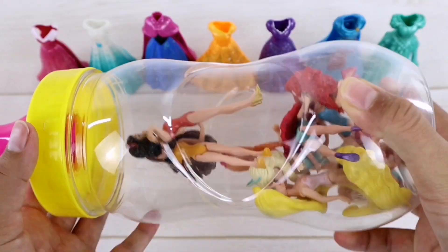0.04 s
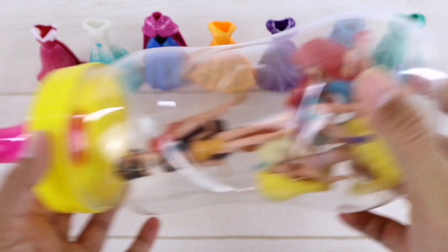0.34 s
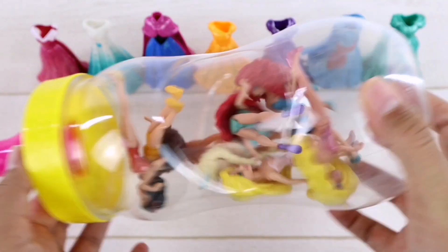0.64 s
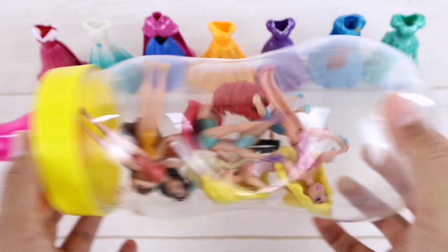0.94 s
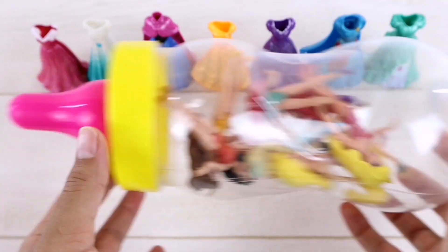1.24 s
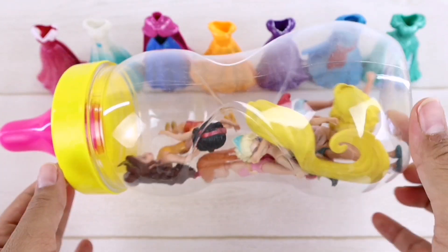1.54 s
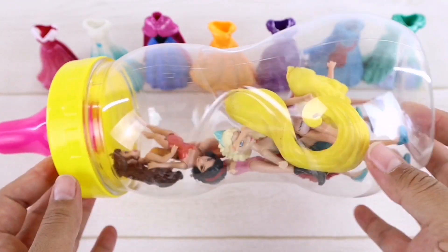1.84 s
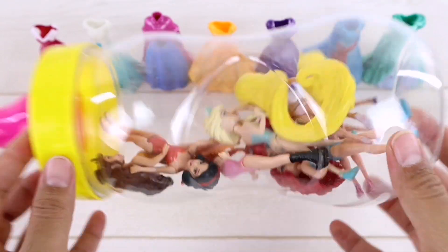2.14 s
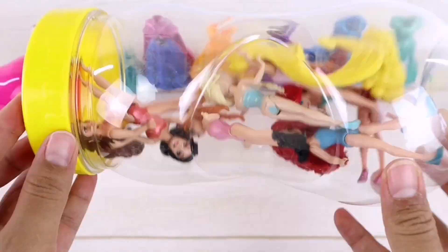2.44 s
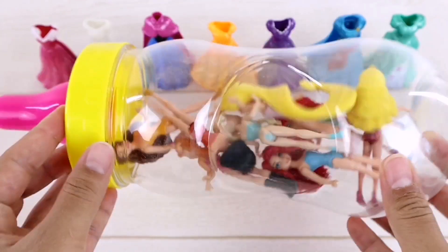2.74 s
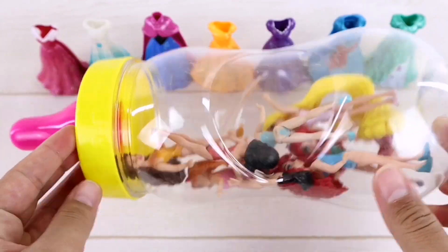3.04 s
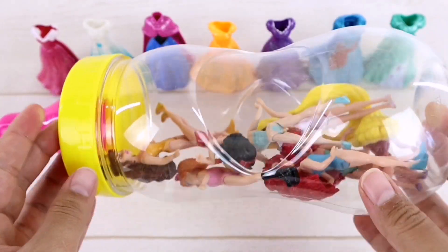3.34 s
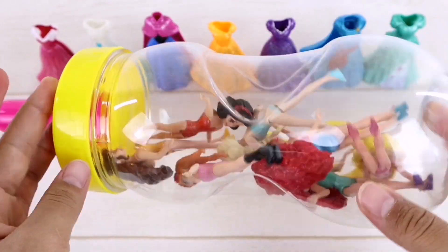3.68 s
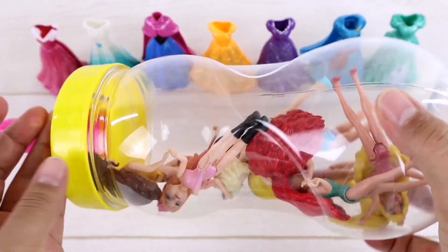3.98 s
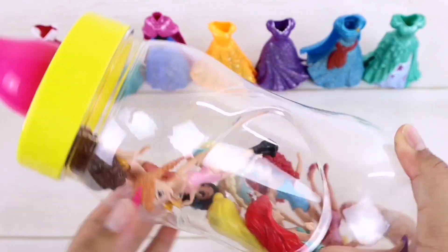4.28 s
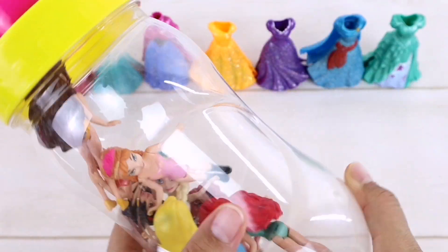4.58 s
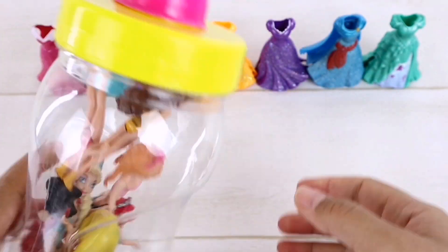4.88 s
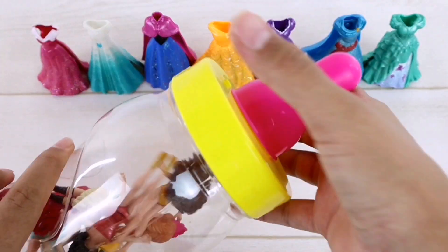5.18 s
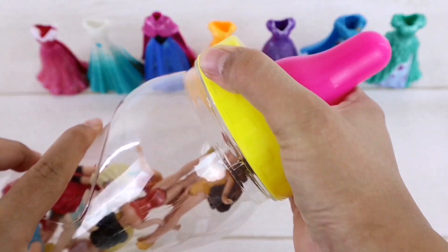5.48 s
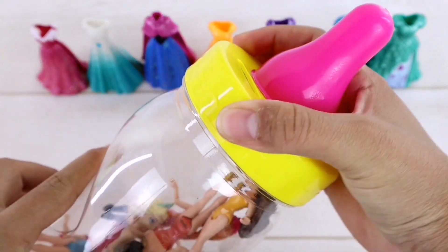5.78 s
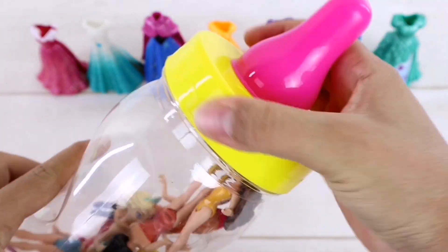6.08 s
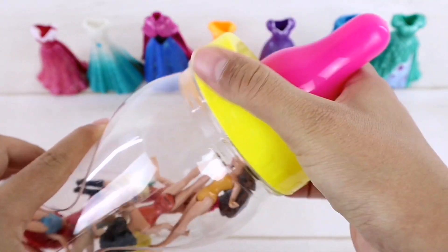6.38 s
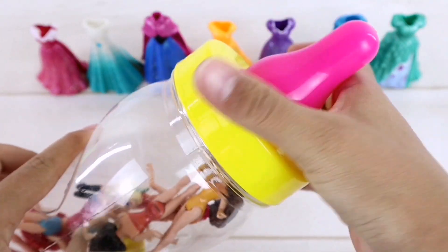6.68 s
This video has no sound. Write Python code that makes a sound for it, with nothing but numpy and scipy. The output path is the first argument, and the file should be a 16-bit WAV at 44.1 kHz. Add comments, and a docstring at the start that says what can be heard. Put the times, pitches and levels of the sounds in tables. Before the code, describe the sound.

Small hard dolls tumble inside a big, thin-walled plastic bottle, heard up close in a small room over a steady low mains hum. From the start until about 1.5 seconds the bottle is shaken, giving dense clacks, knocks and ticks with soft hollow booms. Gentle rocking leaves only a few light clicks, then hard shaking brings a loud clatter from 2.2 to 2.9 seconds. The dolls then roll and slide with sparse ticks and soft rubbing, with sharper knocks near 3.9 and 4.25 seconds. The flexing wall pops lightly around 4 seconds and twice more strongly near 4.7. A tiny finger squeak comes at about 5.15, among a few last clacks that end by 5.5. The screw cap is then twisted three times, at about 5.6, 6.1 and 6.5 seconds, with quiet grainy rasps and small clicks as the thread catches.

```python
"""In a small room, a big plastic baby bottle full of small hard dolls is shaken and turned over.
The dolls tumble against each other and the thin wall, setting its modes ringing in knocks, clacks and
ticks; the hollow bottle booms softly in the hands and its wall pops as it flexes. Then a finger squeaks
and the screw cap is twisted three times, thread rasping on thread. A low mains hum lies underneath."""
import sys
import numpy as np
from scipy import signal
from scipy.fft import rfft, irfft
from scipy.io import wavfile
from scipy.ndimage import uniform_filter1d

SR = 44100
rng = np.random.default_rng(int(sys.argv[2]) if len(sys.argv) > 2 else 0)


def store_pcm(level_fs):
    """Save levels as 16-bit WAV."""
    pcm = np.round(np.clip(level_fs, -1, 1) * 32767).astype(np.int16)
    wavfile.write(sys.argv[1], SR, np.atleast_2d(pcm).T)


N = 300762
TIME = np.arange(N) / SR
RING_SAMPLES, CRACK_SAMPLES = 4400, SR // 125  # a whole hit, and the first 8 ms that set its level
BUSY_DB, SETTLE_DB = -30, -2  # motion of a busy heap; its settling relative to the landing

# The bands of the wall's knock, the dolls' clack and snap, and the contact tick.
# Each row: low edge in Hz, high edge in Hz.
BANDS = [(230, 1100), (1100, 2600), (2600, 5500), (5500, 15500)]
# The dolls land: shaken end to end until 1.5 s, rocked gently, shaken hard from 2.2 to 2.9 s, then
# rolled over and tipped upright. Weight feeds the knock, sharpness the tick; spot and limb set the pitch.
# Each row: start in seconds, level in dB, weight in dB, sharpness in dB, boom in dB, belly ring in dB,
# scatter in seconds, then the pitches of knock, clack and snap in Hz.
LANDINGS = [(0.016, -27.0, 12, 7.5, -13.5, -24.0, 0.011, 290.0, 2260.0, 2750.0),
            (0.033, -15.5, -15, 3, -33, -7.5, 0.0032, 686, 1390, 2750),
            (0.074, -25, 3, 2, -27, -28, 0.0063, 350.0, 1630.0, 2750.0),
            (0.104, -26, 2, -1, -22.5, -22.0, 0.0079, 367, 2500.0, 3400.0),
            (0.116, -29.5, -3, 1, -42, -35.0, 0.003, 350.0, 2500.0, 3430.0),
            (0.161, -41.5, 16.5, 5.0, -29, -42.0, 0.0055, 620.0, 1170.0, 3360.0),
            (0.203, -39.5, 10, 0.0, -47, -29, 0.002, 340.0, 1230.0, 2810.0),
            (0.286, -26.5, -13, 2.5, -43, -30, 0.0036, 1050.0, 1300, 2720),
            (0.3338, -22, 2.5, -5, -25, -4.5, 0.0008, 840, 2340, 3270),
            (0.366, -37, 4, 4, -50, -12.5, 0.0022, 750.0, 2230.0, 3550.0),
            (0.382, -24, 7, -7, -23, -11, 0.005, 497, 1170.0, 4560),
            (0.397, -32, 9, 0, -39, -13, 0.00064, 620.0, 1170.0, 4960.0),
            (0.435, -32, 4.0, -1, -39, -23, 0.0042, 650.0, 2470.0, 4060.0),
            (0.478, -32.5, -5.0, 9.5, -45.0, -27, 0.0041, 640.0, 1790.0, 3880.0),
            (0.504, -27.5, 13, 3, -17, -31.0, 0.0096, 490.0, 2140.0, 4960.0),
            (0.5142, -19.5, 9.5, -2, -41, -14.0, 0.0006, 516, 2140.0, 3800.0),
            (0.5184, -18.5, -9, 10, -42, -30.0, 0.0006, 520.0, 2200.0, 5010.0),
            (0.5276, -23.0, -11, 1.0, -45.0, -35.0, 0.001, 310.0, 2140.0, 5180.0),
            (0.539, -15, -30.0, 10, -25.0, -25.0, 0.002, 830.0, 2200.0, 4900.0),
            (0.587, -34, 0, 4, -40.0, -28, 0.004, 480.0, 1680.0, 3880.0),
            (0.637, -27.5, 3.5, 7, -28, -14, 0.0052, 570.0, 1370.0, 5300.0),
            (0.651, -26, 4.5, 4, -42, -30.0, 0.0047, 610.0, 2030.0, 2780.0),
            (0.6616, -16.0, 3, -5, -28.0, -31, 0.00089, 640.0, 2000, 2780.0),
            (0.68, -27, 0.0, -11, -32.0, -18, 0.0051, 870.0, 1700.0, 4440.0),
            (0.706, -33.0, 7, -17, -21, -9.5, 0.0049, 640.0, 1370.0, 3070.0),
            (0.765, -22, 6, 1, -24, -18, 0.0024, 1040, 1280.0, 3180.0),
            (0.7728, -17.0, -14, 3.5, -32, -36.0, 0.0021, 740.0, 2230.0, 3200),
            (0.792, -27.5, 1, 2, -33, -30.0, 0.0033, 580.0, 2410.0, 5180.0),
            (0.803, -19, -0.5, 9, -20, -21, 0.0034, 260.0, 2370.0, 5170),
            (0.832, -21.5, -32, 6.5, -40.0, -40.0, 0.0013, 260.0, 2500.0, 2750.0),
            (0.868, -29, -9, -7, -33, -30.0, 0.0056, 1050.0, 1170.0, 2750.0),
            (0.906, -32, 16, 6.5, -23.5, -10.5, 0.0044, 640.0, 1170.0, 5300.0),
            (0.919, -27, 7.5, 7, -31, -30.0, 0.00057, 260.0, 2090.0, 2750.0),
            (0.936, -16, -0.5, -4.0, -34.0, -30.0, 0.0025, 395, 1980.0, 2780.0),
            (0.944, -21, 3.5, 4.0, -21.5, -7.5, 0.0043, 370.0, 1420.0, 5300.0),
            (1.011, -29.0, 10.5, -8, -22.0, -24, 0.0051, 443, 1510.0, 3210.0),
            (1.026, -27, 2, 2, -26, -19, 0.0027, 310.0, 1380.0, 3290.0),
            (1.0559, -23, -13.0, 8.5, -19, -31, 0.003, 960.0, 2310.0, 5300.0),
            (1.069, -15.5, -20.0, 5.5, -29, -13, 0.0011, 260.0, 2280, 5300.0),
            (1.09, -23.5, -25.0, 12, -47.0, -37.0, 0.00049, 1050.0, 1810.0, 3320.0),
            (1.134, -26, -4, 5, -45, -16, 0.01, 720.0, 1720.0, 3880.0),
            (1.159, -29.5, 16.5, 3, -16.5, -12, 0.001, 606, 1170.0, 5180.0),
            (1.174, -25.0, 3, 4, -35.0, -30.0, 0.003, 500.0, 1720.0, 2750.0),
            (1.186, -22.5, 11, 0.0, -17, -24, 0.0032, 500.0, 1700.0, 3290.0),
            (1.201, -23, 5, 2, -19, -24, 0.017, 495, 1490.0, 4640.0),
            (1.2992, -23.0, 5, -6, -20, -4, 0.0009, 740, 2440.0, 2750.0),
            (1.3155, -21, -20.0, 11, -50.0, -40.0, 0.00035, 850.0, 2410.0, 3040.0),
            (1.3167, -14, -17, 4, -49.0, -30.0, 0.0012, 850.0, 2410.0, 3040.0),
            (1.331, -32, -5.0, -2, -43, -35.0, 0.002, 380.0, 1660.0, 3210.0),
            (1.376, -32, 9, 3.0, -42, -35.0, 0.0061, 1050.0, 1170.0, 3750.0),
            (1.403, -27, 11, 5, -23.0, -19, 0.0094, 586, 1170.0, 5070.0),
            (1.43, -22, 3, 3, -21, -25.0, 0.014, 870.0, 1260.0, 3460),
            (1.443, -23.5, -2, 7.5, -36, -27, 0.0028, 520.0, 1630.0, 4850.0),
            (1.4549, -20.5, 9.5, 0, -43, -34, 0.0019, 530, 1570.0, 2910.0),
            (1.636, -40, 7.5, 8, -53.0, -29, 0.0033, 260.0, 1220.0, 5100),
            (1.719, -32, -0.5, 5, -31, -19, 0.0033, 410.0, 1400.0, 3590.0),
            (1.735, -30.5, 9, 3.5, -24.5, -19.5, 0.0097, 390.0, 1690, 5180.0),
            (1.874, -53, -7, 4.0, -57, -55.0, 0.0011, 260.0, 1420.0, 4850.0),
            (1.912, -40.5, 0, -2, -37.0, -34, 0.0039, 260.0, 1770.0, 3180.0),
            (1.974, -35.5, -8, 1, -32, -40, 0.0037, 260.0, 2500.0, 2750.0),
            (1.997, -39, -2, -1, -47, -54.0, 0.002, 426, 1300, 2780.0),
            (2.115, -36, -25.0, 5.5, -60.0, -43.0, 0.0014, 1050.0, 2500.0, 4240.0),
            (2.134, -30, 4.5, -11, -27, -26, 0.008, 325, 1810, 2750.0),
            (2.168, -30.5, 3, 1, -23, -29, 0.0044, 640.0, 1530.0, 2750.0),
            (2.246, -22, -14, 6, -26.5, -18, 0.0026, 980.0, 1370.0, 4670),
            (2.301, -24.5, -10, -13, -12.5, -13, 0.0036, 740.0, 1260.0, 3800.0),
            (2.307, -16.0, 4.0, -5, -17.5, -7.5, 0.0037, 746, 1270, 3880.0),
            (2.318, -21.0, 1.5, 10, -32, -30.0, 0.005, 1030.0, 1400.0, 3930.0),
            (2.327, -16, -9, -1, -29, -12, 0.005, 390.0, 1410, 3970.0),
            (2.422, -21.5, 11.5, 10.5, -23, -13, 0.0022, 530.0, 1400.0, 2860),
            (2.433, -22.5, -1, 4, -35.0, -30.0, 0.006, 290.0, 1770.0, 2810.0),
            (2.447, -21.5, 4, 6, -19, -25.0, 0.0078, 530.0, 1740.0, 5300.0),
            (2.485, -29.5, -6, 17, -24, -39, 0.0084, 260.0, 1230.0, 2970.0),
            (2.497, -14, 4, 3.5, -17, -4, 0.004, 690, 1250.0, 2970.0),
            (2.587, -14, -4, 0.5, -17, -18.0, 0.0026, 700.0, 1740.0, 2730),
            (2.604, -24.0, 6, 15, -23, -3.5, 0.0031, 670.0, 1370.0, 4340.0),
            (2.61, -21.5, 5.5, -4, -23, -9.0, 0.0011, 300.0, 1380.0, 4360),
            (2.663, -17.5, 3, 5.5, -19, -23, 0.0047, 260.0, 1230.0, 2940.0),
            (2.671, -17.5, 5, 3, -31, -9.0, 0.004, 260.0, 1220.0, 2750.0),
            (2.682, -15.5, 1, 4, -24, -23.0, 0.0075, 890.0, 2140, 2750.0),
            (2.759, -24.5, 6, 1, -23, -9.5, 0.0015, 640.0, 1910.0, 3550.0),
            (2.7643, -15.5, -0.5, 8.0, -41.0, -34.0, 0.00087, 670.0, 1880, 3570),
            (2.78, -29.5, 6, 9, -43, -30.0, 0.0087, 640.0, 1770.0, 4850.0),
            (2.796, -19.5, 7, -4, -18.0, -3, 0.0054, 695, 1370.0, 4590.0),
            (2.83, -24.5, 11, 5.0, -37, -30.0, 0.0044, 300.0, 1170.0, 4010.0),
            (2.838, -19.5, 1, 3.5, -35.0, -30.0, 0.0027, 300.0, 1170.0, 3970.0),
            (2.844, -16, 1, 2.5, -19, -8.5, 0.003, 810.0, 1170.0, 4640.0),
            (2.854, -20.5, -2, 0, -30, -19, 0.0026, 610.0, 2090.0, 3290.0),
            (2.867, -31, -8, 10, -40.0, -28, 0.004, 260.0, 2090.0, 3110.0),
            (2.973, -36.5, 12, 5, -30, -19, 0.0099, 764, 2170.0, 5300.0),
            (3.022, -28, 0, -1, -41, -16.5, 0.0017, 694, 1170.0, 3040.0),
            (3.162, -46, 6, 9, -45, -55.0, 0.0015, 790.0, 1680.0, 2940.0),
            (3.207, -40, 12, 0, -33, -42.0, 0.022, 420, 1740.0, 3970.0),
            (3.249, -39, -8.0, 7, -33, -60, 0.0017, 330.0, 2280.0, 3360.0),
            (3.28, -44.5, 5.5, 9, -53.0, -46.0, 0.0012, 260.0, 1190.0, 3140.0),
            (3.418, -44, 11.5, 7.5, -25.5, -44, 0.0068, 262, 1170.0, 3800.0),
            (3.596, -46.5, -4, 10, -37, -42, 0.0043, 930.0, 1170.0, 3970.0),
            (3.738, -35, -3, 5.5, -35.0, -42.0, 0.011, 960.0, 2500.0, 3970.0),
            (3.763, -32.5, -13, 4, -34.0, -44.0, 0.0092, 360.0, 2220, 4360),
            (3.804, -37, -6.0, -7.0, -27, -42.0, 0.002, 260.0, 2010.0, 4390.0),
            (3.819, -30.5, 1.5, -1.0, -27, -36.0, 0.007, 450.0, 1720.0, 4390.0),
            (3.839, -29, 1, 2, -25, -34, 0.0025, 890, 1280.0, 4900.0),
            (3.86, -43, 4, 8, -38, -44.0, 0.0026, 260.0, 2090.0, 4740.0),
            (3.8883, -15.5, -3.5, -0.5, -16.5, -23, 0.0012, 264, 2200.0, 2750.0),
            (4.021, -43.5, 6, 3, -41, -49, 0.0036, 307, 1930.0, 4540.0),
            (4.185, -39, -7, 11, -50.0, -50.0, 0.0015, 260.0, 2500.0, 5300.0),
            (4.199, -33, 0, 8.5, -36.0, -42.0, 0.0064, 550.0, 1170.0, 5300.0),
            (4.21, -29.5, 10, 8, -23, -26, 0.003, 547, 1170.0, 4500),
            (4.244, -23.5, 2, -2, -13, -18, 0.0052, 260.0, 2110.0, 3630.0),
            (4.271, -25.5, 2.5, -14, -16.5, -6.5, 0.0016, 473, 1400.0, 2750.0),
            (4.363, -39, 13.5, 10.5, -44.0, -25, 0.0066, 1050.0, 1170.0, 3670),
            (4.514, -34.5, 1, 1, -27, -31, 0.0065, 810.0, 2210, 5300.0),
            (4.538, -30.5, 5.5, -4, -31, -24.0, 0.0003, 760, 1710, 3010.0),
            (4.603, -28, -20, 7, -53, -33, 0.0005, 1040, 2440, 3920),
            (4.768, -25, -4.5, 3, -36, -30, 0.00035, 1050.0, 1880.0, 4290.0),
            (4.776, -28, -22, 3, -47, -38.0, 0.001, 1050.0, 1540, 4200.0),
            (4.799, -26.5, 5.5, -3.0, -16.5, -42.0, 0.0037, 744, 2060.0, 3160),
            (4.858, -56, 25, -10.0, -27, -45.0, 0.0005, 372, 1170.0, 3110.0),
            (4.914, -49.5, 15, 8, -56.0, -49.0, 0.0008, 470.0, 1330.0, 3110.0),
            (4.988, -42.5, 2, 11.5, -41, -47, 0.0014, 260.0, 2470.0, 5300.0),
            (4.996, -41.0, 7, 12, -31, -47.0, 0.0034, 260.0, 1700.0, 5300.0),
            (5.095, -17, -0.5, -5, -19.5, -26, 0.0019, 313, 1440, 3280),
            (5.167, -22.5, -3, 5, -19, -22, 0.0027, 370.0, 1460.0, 4340.0),
            (5.177, -29, 4, 3.0, -36, -35.0, 0.0038, 390.0, 1400.0, 4540.0),
            (5.21, -22, 3.5, 3.5, -20.5, -7, 0.0016, 860, 1930.0, 3150),
            (5.358, -32, 1, -1.0, -32, -17, 0.0041, 1000.0, 1930.0, 4290.0),
            (5.375, -19.5, -18.0, 3, -51, -42, 0.00073, 1000.0, 1980.0, 3360.0),
            (5.383, -20.5, -21, 4, -54, -23, 0.0012, 1050.0, 2500.0, 3320.0),
            (5.446, -37.5, 8, 1, -31.5, -37, 0.0071, 1040, 1160, 2750.0)]
# The cap catches and lets go on its thread. Each row: start in seconds, click level in dB,
# sharpness in dB, cap knock in dB, pitch factor of that knock, scatter in seconds.
CATCHES = [(5.872, -30.5, 9.5, -29, 1.1, 0.00032), (5.887, -34.5, 5, -22, 1, 0.0041),
           (5.908, -40, 8, -43, 0.71, .0004), (5.932, -38, -10, -23.5, 0.79, 0.00081),
           (5.939, -42.5, 2, -36, 1.1, 0.00089), (5.951, -45.5, -7, -40, 0.9, 0.00071),
           (6.047, -47.5, 7, -49, 1.6, 0.017), (6.099, -38, 11, -25.5, 2.02, 0.00033),
           (6.455, -46, -1, -29, 0.71, 0.0023), (6.464, -41, 4, -40, 1.1, .002),
           (6.599, -32, 3, -26.5, 1.17, 0.016), (6.707, -49, 11, -56, 0.89, 0.0017)]


def from_db(db):
    """Decibels to gain."""
    return 10 ** (np.asarray(db) / 20)


def unit_rms(x):
    """Scale to an rms of one."""
    return x / np.sqrt(np.mean(x ** 2) + 1e-20)


def flutter(size, smoothing):
    """Smoothed random wobble at unit rms."""
    return unit_rms(uniform_filter1d(rng.standard_normal(size), size=smoothing))


def at_hz(curve, hz):
    """Read an EQ curve on a log-frequency axis."""
    curve_hz, db = np.transpose(curve)
    return np.interp(np.log(hz + 0.0012), np.log(curve_hz), db)


def nearness(hz, centre_hz, octaves):
    """A bell over pitch, one at its centre."""
    return np.exp(-.5 * (np.log2(hz / centre_hz) / octaves) ** 2)


def add(out, sound, start_s):
    """Mix a sound in at its start time."""
    i = max(int(start_s * SR), 0)
    part = sound[..., :max(N - i, 0)]
    out[..., i:i + part.shape[-1]] += part


def cut(x, hz, kind, order=2):
    """Low- or high-pass filter."""
    return signal.sosfilt(signal.butter(order, min(hz, .45 * SR), kind, fs=SR, output="sos"), x)


def diffuse(curve, size, apart_hz):
    """Coloured stereo noise: centred in the bass, wide above apart_hz."""
    hz = np.arange(size // 2 + 1) * SR / size
    mid, side = rfft(rng.standard_normal((2, size)))
    alike = 1 / (1 + (hz / apart_hz) ** 2)
    pair = np.sqrt(1 + alike) * mid + np.sqrt(1 - alike) * side * [[1], [-1]]
    return unit_rms(irfft(pair * from_db(at_hz(curve, hz)), size))


def room_tone(hum_hz=100, hum_db=-51.5, air_db=-45):
    """Mains hum and the still air of the room."""
    # The colour of the air. Each row: frequency in Hz, relative level in dB.
    air_colour = [(25, -1), (60, 2.5), (110, 7), (160, 18), (250, 2), (600, 1.5), (1500, -9.5),
                  (4000, -16.5), (9000, -25.5), (12000, -30), (13500, -40), (16000, -65)]
    hum = from_db(hum_db) * np.sqrt(2) * np.sin(2 * np.pi * hum_hz * TIME)
    return hum + from_db(air_db) * diffuse(air_colour, N, apart_hz=706)


def room_reverb(x, wet_db=-10, low_t60=0.32, high_t60=0.064, build_s=0.0051):
    """The small room answers with a dense tail that dies sooner in the treble."""
    # The colour of the tail. Each row: frequency in Hz, relative level in dB.
    colour = [(100, -10), (300, -9.5), (700, -7.5), (2000, 2), (6000, 4.5), (15000, 4.5)]
    t = np.arange(SR // 2) / SR
    noise = diffuse(colour, len(t), apart_hz=1570)
    low = cut(noise, 780, "low", order=1)
    tail = low * from_db(-60 * t / low_t60) + (noise - low) * from_db(-60 * t / high_t60)
    tail *= 1 - np.exp(-(t / build_s) ** 2)
    tail /= np.sqrt(np.sum(tail ** 2) / 2)
    return from_db(wet_db) * signal.fftconvolve(x, tail, axes=1)[:, :N]


def wall_lift(hz):
    """Gain in dB that the thin wall's resonances give each frequency."""
    # The wall's resonances. Each row: centre in Hz, width in Hz, lift in dB.
    resonances = [(296.5, 66, 5.5), (385, 27, 6.5), (578, 6.5, 3), (634, 46, 6.5), (763, 23, 5),
                  (798, 145, 7.5), (844, 30, 8), (1036, 117, 10.5), (1321, 71, 7), (1742, 86, 6.5),
                  (1780, 24, -2.5), (1910, 290, 0), (2164, 520, 7.5), (3130, 40, 4.5), (3920, 79, 1.5),
                  (4940, 190, -1.5)]
    return sum(lift / (1 + (2 * (hz - centre) / width) ** 2) for centre, width, lift in resonances)


def heap_motion(at_s, settle_db, slip_db=None, rise_s=0.0052, settle_db_per_s=311, slip_db_per_s=900):
    """The heap stirs, slides and settles after each landing; given slip_db, it also slips into each."""
    # The steady stirring of the heap. Each row: time in seconds, level in dB.
    stir = [(0.0, -22), (0.19, -48), (0.36, -58), (0.51, -27.5), (0.87, -28.5), (1.33, -28), (1.52, -39.5),
            (1.92, -54), (2.09, -47.5), (2.49, -32), (2.7, -30), (2.89, -26.5), (3.02, -35), (3.3, -45),
            (3.55, -41.5), (3.95, -38), (4.33, -42.5), (4.75, -36.5), (4.92, -43.5), (5.32, -35.5),
            (5.39, -43), (6.82, -56)]
    # Slides along the wall as the bottle turns.
    # Each row: middle in seconds, half length in seconds, level in dB.
    slides = [(0.74, 0.026, -23.5), (3.578, 0.017, -34), (3.83, 0.029, -34), (4.216, 0.029, -35),
              (4.289, 0.029, -20.5), (5.195, 0.0069, -22.5)]
    since = at_s[:, None] - np.array(LANDINGS)[:, 0]
    settling = np.clip(since / rise_s, 0, 1) * from_db(settle_db - settle_db_per_s * np.abs(since))
    slipping = 0 if slip_db is None else (since < 0) * from_db(slip_db - slip_db_per_s * np.abs(since))
    sliding = sum(from_db(db) * np.exp(-.5 * ((at_s - s) / half) ** 2) for s, half, db in slides)
    stirring = from_db(np.interp(at_s, *np.transpose(stir)))
    return np.sqrt(stirring ** 2 + sliding ** 2 + np.sum((settling + slipping) ** 2, axis=1))


def rubbing(busy_level_db=-41, waver_db=0.5):
    """Dolls and fingers slide on the smooth wall: a soft rub that swells with the heap's motion."""
    # The colour of plastic on plastic. Each row: frequency in Hz, relative level in dB.
    rub_colour = [(100, -14), (300, 5.5), (700, 3.5), (1200, 1.5), (2500, -6), (5000, -3), (8000, -22.5),
                  (11500, -31), (13500, -30), (16000, -65)]
    slots = np.arange(0, TIME[-1], 1 / 200)
    motion = heap_motion(slots, np.array(LANDINGS)[:, 1] + SETTLE_DB) / from_db(BUSY_DB)
    pressure = from_db(waver_db * flutter(len(slots), smoothing=5))
    hz = np.geomspace(100, SR / 2, 600)
    colour = np.transpose([hz, at_hz(rub_colour, hz) + wall_lift(hz)])
    swell = from_db(busy_level_db) * np.interp(TIME, slots, pressure * motion)
    return swell * diffuse(colour, N, apart_hz=1380)


def finger_squeak(start_s=5.15, length_s=0.019, level_db=-21.5):
    """Skin sticks and slips on the plastic: a short rough tone that drops as the grip slows."""
    start_hz, end_hz, glide_s, roughness = 1000, 900, 0.0035, 0.24
    t = np.arange(SR // 20) / SR
    hz = end_hz + (start_hz - end_hz) * np.exp(-t / glide_s)
    hz *= 1 + roughness * flutter(len(t), smoothing=40)
    swell = np.sin(np.pi * np.minimum(t / length_s, 1))
    out = np.zeros(N)
    add(out, from_db(level_db) * swell * np.sin(2 * np.pi * np.cumsum(hz) / SR), start_s)
    return out


def wall_pops(crack_t60=0.03, ring_t60=0.034, ring_db=-12, click_hz=2000, click_db=8.5):
    """The thin wall flexes in the grip and snaps through: one sharp pulse and a short dry burst."""
    # The pops. Each row: start in seconds, level in dB.
    pops = [(3.924, -31), (3.98, -27), (4.042, -30.5), (4.124, -36), (4.6731, -17), (4.7222, -21.5)]
    # The colour of the burst. Each row: frequency in Hz, relative level in dB.
    colour = [(200, -31), (500, -25), (800, 2), (1300, -13), (1750, 4), (2200, 2), (2900, -6.5),
              (4300, -3.5), (6000, -21), (12000, -45), (16000, -58)]
    t = np.arange(RING_SAMPLES) / SR
    fade = from_db(-60 * t / crack_t60) + from_db(ring_db - 60 * t / ring_t60)
    click = np.sin(2 * np.pi * click_hz * t) * np.exp(-click_hz * t / 2)
    out = np.zeros((2, N))
    for start_s, db in pops:
        burst = diffuse(colour, len(t), apart_hz=2960) * fade
        burst /= np.sqrt(np.mean(burst[:, :CRACK_SAMPLES] ** 2))
        add(out, from_db(db) * (burst + from_db(click_db) * click), start_s)
    return cut(out, 10000, "low", order=4)


def thuds(blows, modes, gain_db, rise_s, detune, spread_db=3):
    """Each blow (start in seconds, level in dB, pitch factor) rings the modes, never quite alike."""
    t = np.arange(SR // 3) / SR
    hz, db, t60 = np.transpose(modes)[:, :, None]
    out = np.zeros(N)
    for start_s, blow_db, pitch in blows:
        strength, phase, tuning = rng.standard_normal((3, len(modes), 1))
        waves = np.sin(2 * np.pi * hz * pitch * (1 + detune * tuning) * t + 1.41 * phase)
        fades = from_db(db + spread_db * strength - 60 * t / t60)
        ring = np.sum(fades * waves, 0) * (1 - np.exp(-t / rise_s))
        add(out, ring / np.abs(ring).max() * from_db(blow_db + gain_db), start_s)
    return out


def bottle_boom():
    """Landing dolls and bumping hands jolt the hollow bottle into a soft, deep boom."""
    # The bottle's deep modes. Each row: frequency in Hz, level in dB, time to fall 60 dB in seconds.
    modes = [(117, -29, .12), (146, -3, .33), (155, 11, .12), (173.4, -10, .28), (223, 1, .05),
             (255, -3, .045)]
    # The hands bump the bottle. Each row: start in seconds, level in dB.
    bumps = [(.412, -22), (.597, -21), (.748, -15.5), (.874, -21), (1.253, -22), (2.013, -31), (2.395, -33),
             (2.911, -21), (3.591, -33), (3.963, -22.5), (4.639, -23), (5.029, -29), (5.89, -28),
             (6.6, -26)]
    jolts = [(s, boom_db, 1) for s, _, _, _, boom_db, *_ in LANDINGS] + [(s, db, 1) for s, db in bumps]
    return thuds(jolts, modes, gain_db=2.5, rise_s=0.011, detune=0.047)


def belly_ring(focus_db=12, focus_octaves=.2):
    """The bottle's belly rings hollow after each landing, favouring the modes nearest the knock."""
    # The belly's modes. Each row: frequency in Hz, level in dB, time to fall 60 dB in seconds.
    belly_modes = [(386, -11, 0.068), (550, -11, 0.083), (726, 0, 0.079), (766.2, 0, 0.098),
                   (852, -6, 0.035)]
    # The grip flexes the belly and bends its note. Each row: time in seconds, pitch factor.
    grip = [(.3, 1.01), (.8, 0.96), (1.3, 1.023), (2.4, 0.99), (2.85, 1), (4.5, 1.17), (5.2, 1.15)]
    hz, db, t60 = np.transpose(belly_modes)
    out = np.zeros(N)
    for s, _, _, _, _, ring_db, _, knock_hz, *_ in LANDINGS:
        pitch = np.interp(s, *np.transpose(grip))
        modes = np.transpose([hz, db + focus_db * nearness(hz * pitch, knock_hz, focus_octaves), t60])
        out += thuds([(s, ring_db, pitch)], modes, gain_db=-4.5, rise_s=0.0003, detune=0.013)
    return out


def cap_knocks():
    """The cap knocks on the bottle neck each time its thread catches and lets go."""
    # The cap's modes. Each row: frequency in Hz, level in dB, time to fall 60 dB in seconds.
    modes = [(212, 13.5, 0.046), (244, 7.5, 0.038), (318, -1, 0.052), (452, -20, 0.1), (490, -6, 0.05)]
    knocks = [(s, knock_db, pitch) for s, _, _, knock_db, pitch, _ in CATCHES]
    return thuds(knocks, modes, gain_db=2.5, rise_s=0.0015, detune=0.033)


def thread_rasp(rasp_db=2.5, hiss_db=3, split_hz=3450, grain_db=2.4, release_db_per_s=280):
    """Thread slides on thread: micro-slips so dense that they merge into a grainy hiss."""
    # Pushes of the hand on the cap; in the faint ones the fingers only slide into a new grip.
    # Each row: start, attack and hold in seconds, level in dB, extra hiss in dB.
    twists = [(5.26, 0.076, 0.043, -58, 3.5), (5.594, 0.031, 0.22, -43.5, -4.5),
              (5.93, 0.053, 0.065, -63.5, 5.5), (6.089, 0.07, 0.076, -39, -0.5),
              (6.485, 0.037, 0.029, -39, -2), (6.555, 0.045, 0.014, -34, -4.5)]
    # The colour of the rasp. Each row: frequency in Hz, relative level in dB.
    colour = [(180, -8), (300, 1.5), (587, -1.5), (714, -0.5), (775, 0.5), (1090, -0.5), (1400, -2.5),
              (2780, 2), (4320, -4), (4770, -1), (7180, -7), (11400, -7), (13500, -17), (15000, -31)]
    slips = from_db(grain_db * flutter(N, smoothing=40))
    friction = diffuse(colour, N, apart_hz=1550) * slips
    rasp = unit_rms(cut(friction, split_hz, "low", order=3))
    hiss = unit_rms(cut(friction, split_hz, "high", order=3))
    out = np.zeros((2, N))
    for start, attack, hold, db, bright_db in twists:
        t = TIME - start
        speed = np.clip(t / attack, 0, 1) * from_db(-release_db_per_s * np.maximum(t - attack - hold, 0))
        out += speed * (rasp * from_db(db + rasp_db) + hiss * from_db(db + bright_db + hiss_db))
    return out


def strikes(lag_s, centre_hz, band, focus_db, crack_t60, ring_t60, ring_db, apart_hz, linger, comb_db):
    """One stereo ring per contact: each spot excites the crowded modes its own way, most near its pitch."""
    # The colour of struck plastic. Each row: frequency in Hz, relative level in dB.
    plastic = [(230, -6), (450, 1.5), (580, 2.5), (720, -2.5), (1000, -12), (1500, -6.5), (2100, -8),
               (2700, -14.5), (4800, -11.5), (6500, -14.5), (9000, -20.5), (12000, -23.5), (15500, -53)]
    low, high = band
    mode_count = 140
    t = np.arange(RING_SAMPLES) / SR
    hz = low + (high - low) * (np.arange(mode_count) + rng.random(mode_count)) / mode_count
    wall_db = wall_lift(hz)
    # Low and resonant modes last longer.
    sustain = ((np.sqrt(low * high) / hz) ** .5 * from_db(linger * wall_db))[:, None]
    fade = from_db(-60 * t / (crack_t60 * sustain)) + from_db(ring_db - 60 * t / (ring_t60 * sustain))
    phase = 2 * np.pi * hz[:, None] * t
    modes = fade * (1 - np.exp(-phase)) * np.exp(1j * phase)
    real, imag, skew, spot = rng.standard_normal((len(lag_s), 4, mode_count)).swapaxes(0, 1)
    nodes_db = comb_db * np.cos(4 * spot[:, :1] * np.log(hz))  # modes with a node here are quieter
    push = real + 1j * (imag - .17)  # the modes start partly in step: a sharp first crack
    near = nearness(hz, centre_hz[:, None], octaves=0.11)
    drive = push * from_db(at_hz(plastic, hz) + wall_db + nodes_db + focus_db * near)
    # Left and right differ more in phase as pitch rises, which widens the treble.
    turn = np.pi * hz * lag_s[:, None] + skew * hz / (hz + apart_hz)
    pair = np.stack([((drive * np.exp(1j * side * turn)) @ modes).real for side in (-1, 1)], 1)
    return pair / np.sqrt(np.mean(pair[..., :CRACK_SAMPLES] ** 2, axis=(1, 2), keepdims=True))


def contacts(lag_s, knock_hz, clack_hz, snap_hz, tick_hz=11200):
    """Plastic hits plastic: knock, clack, snap and tick of each contact, lag_s apart left to right."""
    knock = strikes(lag_s, knock_hz, BANDS[0], focus_db=8.5, crack_t60=0.01, ring_t60=0.12,
                    ring_db=-11.5, apart_hz=7960, linger=0.54, comb_db=-3)
    clack = strikes(lag_s, clack_hz, BANDS[1], focus_db=5, crack_t60=0.011, ring_t60=0.052,
                    ring_db=-6, apart_hz=1500, linger=0.45, comb_db=3)
    snap = strikes(lag_s, snap_hz, BANDS[2], focus_db=4, crack_t60=0.009, ring_t60=0.05,
                   ring_db=-9, apart_hz=2300, linger=0.2, comb_db=3)
    tick = strikes(lag_s, np.full(len(lag_s), tick_hz), BANDS[3], focus_db=0.5, crack_t60=0.023,
                   ring_t60=0.097, ring_db=-18.5, apart_hz=6170, linger=0.3, comb_db=4)
    return knock, clack, snap, tick


def doll_rattle(touches_per_s=420, spread_db=11, knock_db=-8.5, bright_db=-9.5, variants=40):
    """Many light, uneven touches as the heap shifts; the heavier a landing, the more it is unsettled."""
    snap_db, tick_db, lag_s, slot_s = -1.5, -7.5, 5e-5, 0.001
    pitches = [low * (high / low) ** rng.random(variants) for low, high in BANDS[:3]]
    knock, clack, snap, tick = contacts(lag_s * (1 + 0.084 * rng.standard_normal(variants)), *pitches)
    touches = np.stack([knock, clack + from_db(snap_db) * snap + from_db(tick_db) * tick], 1)
    touches = cut(touches, 12700, "low", order=6)  # too soft for the highest modes
    slots = np.arange(0, TIME[-1], slot_s)
    _, level, weight, *_ = np.transpose(LANDINGS)
    knock_motion = heap_motion(slots, level + SETTLE_DB + 0.79 * weight, slip_db=level + weight - 7)
    bright_motion = heap_motion(slots, level + SETTLE_DB + 0.85 * weight)
    density = np.minimum(bright_motion / from_db(BUSY_DB), 1) ** .9  # a calm heap touches less often
    out = np.zeros((2, 2, N))
    for s, chance in zip(slots, touches_per_s * slot_s * density):
        luck, late, force, kind = rng.random(4)
        if luck < chance:
            add(out, touches[int(kind * variants)] * from_db(spread_db * force ** 2), s + late * slot_s)
    knocks = unit_rms(out[0]) * from_db(knock_db) * np.interp(TIME, slots, knock_motion)
    bright = unit_rms(out[1]) * from_db(bright_db) * np.interp(TIME, slots, bright_motion)
    return knocks + bright


def clatter(clack_db=3, snap_db=1.17, tick_db=-9.5, lag_s=5.5e-5, pan_db=2, upright_s=5.05):
    """The clear hits of landing dolls and the catching cap, with lesser hits around each main blow."""
    catch_weight_db, catch_hz = 2.5, (302, 2340, 3420)  # knock, clack and snap of a catch
    extra_hits, extra_db, early_share = 7, -4.5, .25
    blows = [(s, db, weight, sharpness, *rest) for s, db, weight, sharpness, _, _, *rest in LANDINGS]
    blows += [(s, db, catch_weight_db, sharpness, scatter, *catch_hz)
              for s, db, sharpness, _, _, scatter in CATCHES]
    starts, level, weight, sharpness, scatter_s, *pitches = np.transpose(blows)
    side = np.where(starts < upright_s, 1, -1)  # the wall faces the other way once tipped up
    lags = lag_s * (side + 0.28 * rng.standard_normal(len(starts)))
    shift_db = 0.22 * sharpness  # a sharp limb trades clack for snap
    balance_db = (weight, clack_db - shift_db, snap_db + shift_db, tick_db + sharpness)
    parts = contacts(lags, *pitches)
    knock, *upper = [part * from_db(level + db)[:, None, None] for part, db in zip(parts, balance_db)]
    hits = knock + sum(upper) * from_db(pan_db * side[:, None, None] * np.array([[-.5], [.5]]))
    tops_hz = 14400 + 123 * (level - level.max())  # a softer contact is duller
    out = np.zeros((2, N))
    for start_s, hit, top_hz, span_s in zip(starts, hits, tops_hz, scatter_s):
        hit = cut(hit, top_hz, "low", order=4)
        late, force = rng.random((2, extra_hits))
        crowd = span_s / (span_s + 0.0089)  # wide scatter favours the lesser hits
        add(out, hit * np.sqrt(1 - crowd), start_s)
        for k in range(extra_hits):
            delay_s = span_s * ((k + late[k]) / extra_hits - early_share)
            add(out, hit * (-1) ** k * crowd * (.5 + force[k]) * from_db(extra_db), start_s + delay_s)
    return out


def scene():
    """Dolls, bottle and cap up close, over the room's reverb and hum."""
    bottle = clatter() + doll_rattle() + wall_pops() + belly_ring() + rubbing()
    bottle += bottle_boom() + cap_knocks()
    bottle = cut(bottle, 122, "high")  # a small body radiates little deep bass
    bottle += thread_rasp() + finger_squeak()
    return bottle + room_reverb(bottle) + room_tone()


def record(dry, top_hz=15600):
    """The loudest peaks are rounded off and the top is cut steeply."""
    rounded = dry / (1 + dry ** 6) ** (1 / 6)
    return signal.sosfilt(signal.ellip(10, .1, 80, top_hz, fs=SR, output="sos"), rounded)


dry = scene()
out = record(dry)
store_pcm(out)
```